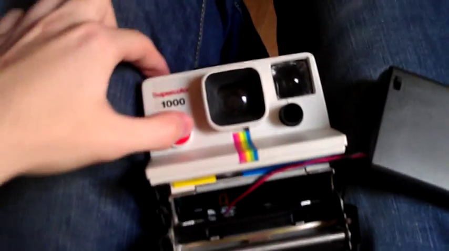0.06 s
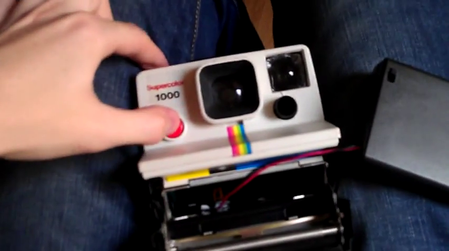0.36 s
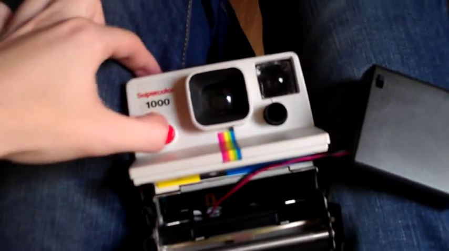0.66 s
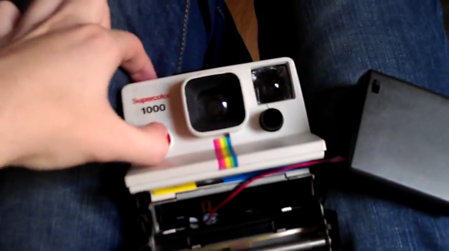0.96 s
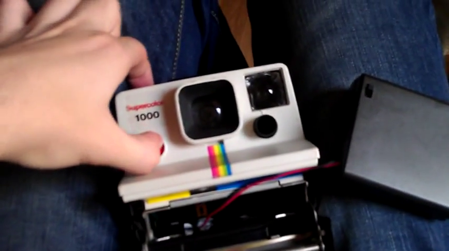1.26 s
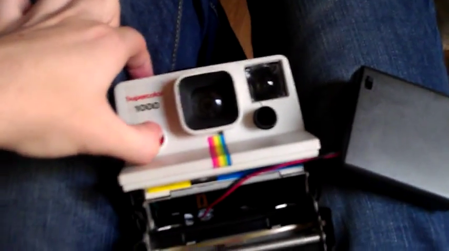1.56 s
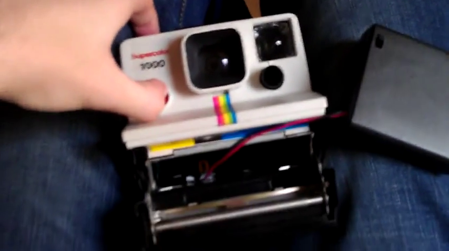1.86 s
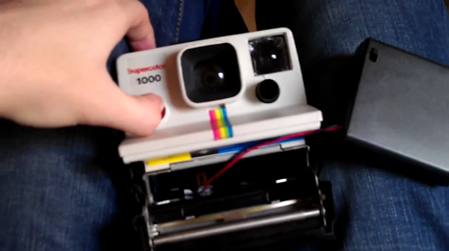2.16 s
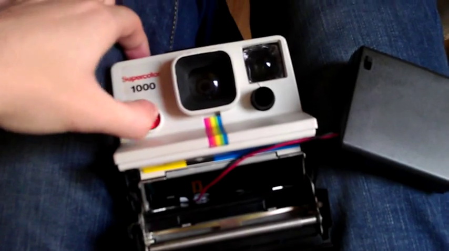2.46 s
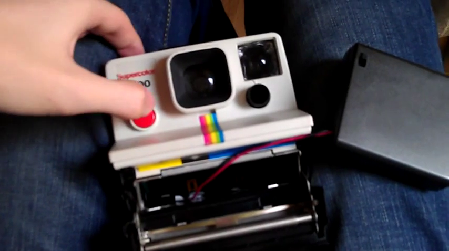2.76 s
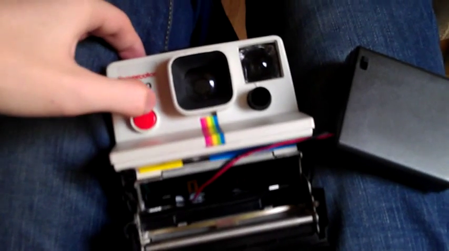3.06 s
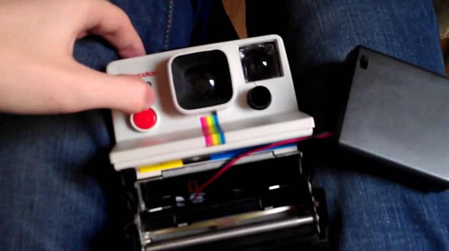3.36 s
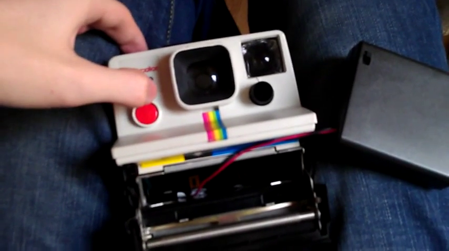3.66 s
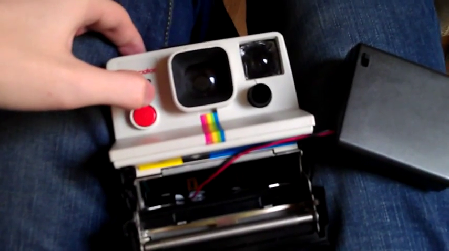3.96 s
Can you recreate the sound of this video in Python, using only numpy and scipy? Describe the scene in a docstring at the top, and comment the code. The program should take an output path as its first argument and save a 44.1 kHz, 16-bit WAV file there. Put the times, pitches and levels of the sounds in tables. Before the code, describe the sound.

Instant camera clacking sharply as its button is pressed, then whirring through plastic gears on release.

```python
"""A hand rubs softly on plastic in a quiet room, and the button of an instant camera creaks down, close up.
The shutter clacks in the hollow housing and leaves a spring singing. On release a latch snaps, the motor
spins up and whirs through its plastic gears, and a cam scrapes along its follower and drops once.
Far away, a small bird chirps very faintly."""
import sys
import numpy as np
from scipy import signal
from scipy.fft import rfft, irfft
from scipy.io import wavfile
from scipy.ndimage import uniform_filter1d, map_coordinates

SR = 44100
rng = np.random.default_rng(int(sys.argv[2]) if len(sys.argv) > 2 else 0)


def put_to_file(sound):
    """Save the sound as 16-bit audio at rate SR, in the file named by the first command-line argument."""
    columns = np.atleast_2d(sound).T  # one column per channel
    safe = np.clip(columns, -1, 1)
    whole_steps = np.round(safe * 32767)
    wavfile.write(sys.argv[1], SR, whole_steps.astype(np.int16))


N = 176400

# rumble and hiss of the room: freq_hz, gain_db
ROOM_EQ = [(15, -42), (28, -33), (42, -6), (55, -12.5), (78, -3), (112, -3.5), (145, -5.5), (212, -7),
           (330, -6), (545, -11), (1100, -17), (2500, -21.5), (3100, -25.5), (4600, -24.5), (7000, -27),
           (8500, -25), (11000, -30.5)]
# distant bird: start_s, level_db, length_s
BIRD_CHIRPS = [(.66, -64, .04), (1.218, -62, 0.036), (1.599, -60, 0.047), (1.821, -58.5, 0.051),
               (1.992, -55, 0.048), (2.174, -58, 0.038), (2.31, -57.5, 0.049), (2.447, -55, 0.052)]
# hand rubbing the housing: time_s, level_db
RUB_ENVELOPE = [(0, -58), (.25, -67.5), (.45, -60.5), (.9, -64), (1.1, -73), (1.6, -76), (2.5, -75)]
# dry brush of skin on plastic: freq_hz, gain_db
RUB_EQ = [(300, -2), (1000, -2), (1800, 1), (2550, -0.5), (2850, -13), (7000, -13.5), (8500, -4.5),
          (11000, -15.5)]
# creaks of the button under the thumb: start_s, thump_db, knock_db, tick_db
BUTTON_CREAKS = [(.224, -63, -54.5, -68), (.452, -61, -55, -54), (.856, -51.5, -44.5, -55),
                 (.888, -56.5, -47, -48.5), (.927, -62, -51, -46), (0.953, -50, -56.5, -56.5),
                 (1.0356, -46, -38.5, -63.5), (1.104, -50.5, -51.5, -65), (1.173, -48, -46, -48)]
# soft knock on the housing: freq_hz, gain_db
KNOCK_EQ = [(500, -24), (1300, -12.5), (1800, 7), (2300, -6), (3000, -18), (6000, -33.5)]
# low boom of the plastic case: freq_hz, gain_db
BOOM_EQ = [(60, -10), (150, -9), (300, -10.5), (420, -1.5), (520, 4), (650, -7.5), (900, -3.5),
           (1500, -23.5), (4000, -52.5)]
# coil spring singing after the shutter: pitch_hz, level_db, t60_s
COIL_MODES = [(2590, -65.5, 2.5), (5260, -50, .5)]
# cam sliding on its follower: time_s, level_db
SCRAPE_ENVELOPE = [(3.722, -70), (3.732, -23), (3.745, -31.5), (3.78, -30.5), (3.83, -35), (3.89, -54),
                   (3.905, -24), (3.92, -37), (3.99, -32)]
# bright grit of that slide: freq_hz, gain_db
SCRAPE_EQ = [(500, -21), (1100, -28), (1700, -9), (2500, -6.5), (3600, -11.5), (4300, -4), (5600, 2.5),
             (7300, 4.5), (9000, 4), (11000, -15)]
# spin of the motor shaft: time_s, speed_hz
SHAFT_SPEED = [(2.67, 40), (2.72, 115), (2.76, 160), (2.79, 182), (2.82, 199), (2.852, 209.5), (2.9, 217),
               (2.992, 223.6), (3.078, 226.3), (3.25, 227.6), (3.4, 227.3), (3.608, 223.2), (3.72, 225.7),
               (3.818, 220.5), (3.896, 222.7), (3.99, 225.2)]
# strength of the drive: time_s, level_db
DRIVE_ENVELOPE = [(2.67, -45), (2.705, -46), (2.722, -33.5), (2.76, -30), (2.79, -29), (2.85, -30),
                  (2.9, -27.5), (3.08, -27.5), (3.3, -26.5), (3.5, -27.5), (3.61, -27.5), (3.712, -27.5),
                  (3.8, -27), (3.896, -29), (3.99, -30)]
# tones of shaft and gear mesh: shaft_multiple (played at the nearest whole one), free_db, pushing_cam_db
MOTOR_TONES = [(1, -16, -15.5), (1.907, -17.5, -25), (2.97, -9, -7), (3.98, -9, -12), (5.22, -9.5, -10.5),
               (6.09, -3.5, -9), (7.25, -13, -9), (8, -12, -16), (9.1, -7, -6.5), (10, -11.5, -15),
               (11.2, -14.5, -9.5), (12, -19, -22), (12.8, -13.5, -13), (17.526, -3.5, -4.5),
               (20.597, 1, 1), (24, -7, -10), (25.4, -4.5, -8), (36.4, -2, -12), (38.06, -5, -14),
               (40, -8, -14), (40.5, -2, -10), (42.23, -0.5, -20), (43, -2, -12)]
# how well the housing radiates those tones: freq_hz, gain_db
HOUSING_EQ = [(230, -4.5), (380, -14), (500, 13.5), (600, 1), (680, -2), (780, 5), (930, -24), (1120, 4),
              (1250, -20), (1350, 2), (2300, 1), (3700, -19), (3950, -5), (4080, -3), (4250, -1.5),
              (4550, -7.5), (4770, 2.5), (5000, -2), (5400, -0.5), (7900, -11), (8400, -0.5)]
# rattling gear train: freq_hz, gain_db
GEAR_EQ = [(80, -29), (250, -26.5), (380, -24), (520, -16), (760, -15.5), (980, -22.5), (1300, -13),
           (1850, -5), (2300, -10.5), (2750, -16), (3150, -13), (3430, -16), (3560, -33), (3760, -28),
           (3900, -17.5), (4200, -7), (5000, -10.5), (5500, -0.5), (6700, -5), (7250, -1), (7950, -10),
           (8700, 2), (9600, 1.5), (10400, 0.5), (11200, -9.5)]
# snaps of the mechanism: start_s, level_db, body_send_db, spring_send_db, t60_s
LEVER_SNAPS = [(1.311, -45.5, 9.5, -20, 0.098), (1.3324, -8, -4.5, -30, 0.04),
               (1.3421, -6, 0.5, -29, 0.019), (1.355, -33.5, 2, -22, .16), (1.38, -23.5, 2, -15, 0.033),
               (1.3986, -22.5, 0, -26, 0.024), (1.416, -38, 8, -20, 0.023), (2.576, -49.5, 4.5, -24, 0.24),
               (2.6298, -44, 9, -20, 0.09), (2.6428, -18, 5, -25, 0.069), (2.651, -26, -18, -8, 0.038),
               (2.6614, -7.5, -7.5, -0.5, 0.019), (2.681, -30, 14, -23.5, 0.032),
               (3.9095, -5, 2, -30, 0.021), (3.947, -30, -2, -27, 0.032)]
# sharp crack of a snap: freq_hz, gain_db
CRACK_EQ = [(600, -30.5), (1300, -0.5), (2200, 1.5), (3000, 0.5), (3650, -9.5), (4150, 5.5), (4700, -0.5),
            (5400, 6.5), (6400, 4.5), (7000, 3.5), (8200, 2.5), (8800, 7.5), (10000, 4.5), (11200, 1)]
# hollow body of the housing: freq_hz, gain_db
BODY_EQ = [(60, -25.5), (160, -23.5), (300, -14.5), (530, -4.5), (950, -4.5), (1300, -2.5), (1850, 11.5),
           (2300, 3), (2800, -21.5), (5000, -39.5)]
# short ring of the latch spring: pitch_hz, relative_db, t60_s
LATCH_MODES = [(5100, -4, .012), (5270, 0, .012), (8700, 0, .012), (8850, -4, .015)]


def undb(db):
    """Decibels to gain."""
    return 10 ** (np.asarray(db) / 20)


def unit(x):
    """Scale to rms 1."""
    return x / np.sqrt(np.mean(x ** 2) + 1e-20)


def noise():
    """White noise."""
    return rng.standard_normal(N)


def curve(x, points):
    """Straight lines between breakpoints, read at x."""
    return np.interp(x, *np.array(points).T)


def decay(age, t60_s):
    """Fade that loses 60 dB in t60_s."""
    return np.exp(-np.log(1000) * age / t60_s)


def drift(rate_hz):
    """Smooth random wander with rms 1."""
    step = max(int(SR / rate_hz), 1)
    stairs = np.repeat(noise()[:N // step + 1], step)
    return unit(uniform_filter1d(stairs, step)[:N])


def eq(x, points, size=4096):
    """Causal filter through (freq_hz, gain_db) points; white noise keeps its power."""
    hz, db = np.array(points, float).T
    bins_hz = np.arange(size // 2 + 1) * SR / size
    gain = undb(np.interp(np.log(bins_hz + 1), np.log(hz), db))
    cepstrum = irfft(np.log(unit(gain)))
    cepstrum[1:size // 2] *= 2  # minimum phase keeps the attacks crisp
    cepstrum[size // 2 + 1:] = 0
    return signal.fftconvolve(x, irfft(np.exp(rfft(cepstrum))))[:N]


def burst(t, start_s, t60_s, attack_s=0.0011, contact_s=0.0017):
    """Envelope of a contact: fast rise, brief hold, decay."""
    age = t - start_s
    return np.clip(age / attack_s, 0, 1) * decay(np.clip(age - contact_s, 0, 10 * t60_s), t60_s)


def reverb(x, t, t60_s, build_s=0.002):
    """Diffuse reflections with about the energy of the dry sound."""
    tail = (noise() * decay(t, t60_s) * np.clip(t / build_s, 0, 1))[:SR]
    return signal.fftconvolve(x, tail / np.linalg.norm(tail))[:N]


def room_tone(t, hum_hz=74.5):
    """A bed of low rumble and hiss, with a wavering hum and its octave."""
    phase = 2 * np.pi * np.cumsum(hum_hz + 1.5 * drift(9.3)) / SR
    hum = undb(-63.5 + 3.1 * drift(3)) * np.sin(phase)
    octave = undb(-67.5 + 2.4 * drift(3.98)) * np.sin(2 * phase)
    return undb(-56.5) * eq(noise(), ROOM_EQ) + hum + octave


def bird(t, from_hz=6600, to_hz=5130):
    """Thin, rough falling chirps, blurred by distance."""
    rasp = 1 + 0.084 * drift(700)
    chirps = 0
    for start, db, length in BIRD_CHIRPS:
        progress = np.clip((t - start) / length, 0, 1)
        hz = (from_hz + (to_hz - from_hz) * progress) * rasp
        chirps += undb(db) * np.sin(np.pi * progress) * np.sin(2 * np.pi * np.cumsum(hz) / SR)
    return reverb(chirps, t, t60_s=0.19)


def hand_rub(t):
    """Skin brushes the housing, faint and uneven."""
    return undb(curve(t, RUB_ENVELOPE) + 1.4 * drift(25)) * eq(noise(), RUB_EQ)


def button_creak(t, thump_t60_s=0.05, click_t60_s=0.018):
    """The button sticks and slips on its way down; each slip is a thump, a knock and a bright tick."""
    thump = sum(undb(db) * burst(t, start, thump_t60_s) for start, db, _, _ in BUTTON_CREAKS)
    knock = sum(undb(db) * burst(t, start, click_t60_s) for start, _, db, _ in BUTTON_CREAKS)
    tick = sum(undb(db) * burst(t, start, click_t60_s) for start, _, _, db in BUTTON_CREAKS)
    return eq(thump * noise(), BOOM_EQ) + eq(knock * noise(), KNOCK_EQ) + eq(tick * noise(), CRACK_EQ)


def coil_spring(t, shutter_s=1.344):
    """The shutter sets a coil spring ringing faintly."""
    age = np.maximum(t - shutter_s, 0)
    return sum(undb(db) * np.sin(2 * np.pi * hz * age) * decay(age, t60) for hz, db, t60 in COIL_MODES)


def case_boom(t, t60_s=0.26):
    """Every snap leaves the plastic case booming softly."""
    envelope = sum(undb(db) * burst(t, start, t60_s) for start, db, *_ in LEVER_SNAPS)
    return undb(-36) * eq(envelope * noise(), BOOM_EQ)


def cam_scrape(t):
    """Gritty friction while the cam lifts its follower."""
    envelope = undb(curve(t, SCRAPE_ENVELOPE)) * (t > SCRAPE_ENVELOPE[0][0])
    grit = unit(undb(1.8 * drift(900)) * noise())
    return eq(envelope * grit, SCRAPE_EQ)


def gear_rattle(turns, size=192):
    """Plastic teeth chatter, pulsing with the shaft and partly alike from turn to turn."""
    repeating = map_coordinates(rng.standard_normal(size), [turns % 1 * size], mode="grid-wrap")
    pulse = 1 + 0.12 * np.cos(2 * np.pi * turns)
    scatter_db = 1.6 * drift(210) + 1.5 * drift(1800)  # turn to turn, tooth to tooth
    return unit(pulse * undb(scatter_db)) * (noise() + undb(-11) * repeating)


def motor_whine(t, shaft_hz, turns, cam_s=3.728, cam_rise_s=0.018, bright_from_hz=193.5):
    """Shaft and gear mesh sing through the housing; their balance shifts as they push the cam."""
    cam = np.clip((t - cam_s) / cam_rise_s, 0, 1)
    dull_db = 0.9 * np.minimum(shaft_hz - bright_from_hz, 0)  # upper tones fade at low speed
    whine = 0
    for multiple, free_db, pushing_db in MOTOR_TONES:
        db = free_db + (pushing_db - free_db) * cam
        db += curve(multiple * shaft_hz, HOUSING_EQ) + dull_db * min(multiple / 10, 2)
        db += 1.5 * drift(14) + 0.85 * drift(130)  # slow waver, fast flutter as the teeth catch
        whine += undb(db) * np.sin(2 * np.pi * (round(multiple) * turns + rng.random()))
    return whine


def motor(t, flutter=0.00126, whine_db=-8.5):
    """The motor spins up, and its one shaft drives both the whine and the gear rattle."""
    shaft_hz = curve(t, SHAFT_SPEED) * (1 + flutter * drift(45))
    turns = np.cumsum(shaft_hz) / SR
    drive = undb(curve(t, DRIVE_ENVELOPE)) * (t > DRIVE_ENVELOPE[0][0])
    whine = undb(whine_db) * motor_whine(t, shaft_hz, turns)
    return drive * whine + eq(drive * gear_rattle(turns), GEAR_EQ)


def lever_clacks(t, body_return_db=-12):
    """Shutter, latch and cam snap home: a sharp crack, the hollow housing and a short spring ring."""
    crack = body = spring = 0
    for start, db, body_send_db, spring_send_db, t60 in LEVER_SNAPS:
        hit = undb(db) * burst(t, start, t60)
        crack += hit
        body += undb(body_send_db) * hit
        spring += undb(spring_send_db) * hit
    age = t[:SR // 4]
    ring = sum(undb(db) * np.sin(2 * np.pi * hz * age) * decay(age, t60) for hz, db, t60 in LATCH_MODES)
    plastic = eq(crack * noise(), CRACK_EQ) + undb(body_return_db) * eq(body * noise(), BODY_EQ)
    metal = signal.fftconvolve(spring * noise(), ring / np.linalg.norm(ring))[:N]
    return plastic + metal


def scene():
    """The camera up front on a lap, room and bird behind it, the same in both ears."""
    t = np.arange(N) / SR
    camera = lever_clacks(t) + coil_spring(t) + case_boom(t)
    camera += hand_rub(t) + button_creak(t) + motor(t) + cam_scrape(t)
    early = undb(-13.5) * reverb(camera, t, t60_s=0.08)  # off lap and hand
    room_tail = undb(-16.5) * reverb(camera, t, t60_s=0.39)
    mono = camera + early + room_tail + bird(t) + room_tone(t)
    return np.array([mono, mono])


def record(dry, top_hz=11150):
    """Soft saturation rounds the loudest peaks and a steep low-pass cuts the top."""
    lowpass = signal.ellip(12, 0.2, 80, top_hz, fs=SR, output="sos")
    return signal.sosfilt(lowpass, np.tanh(dry))


dry = scene()
out = record(dry)
put_to_file(out)
```